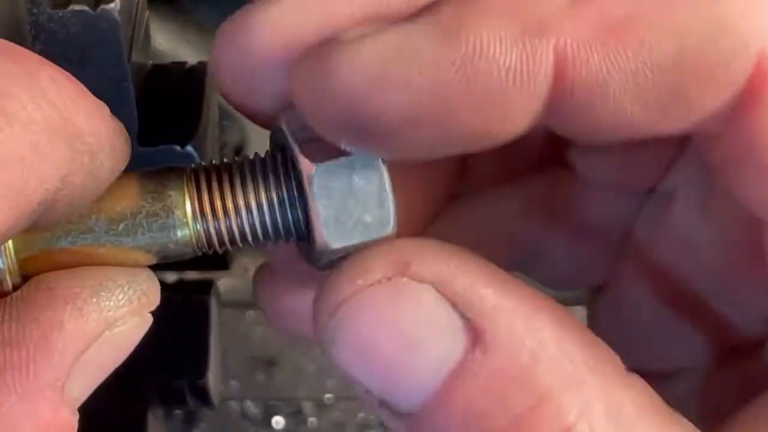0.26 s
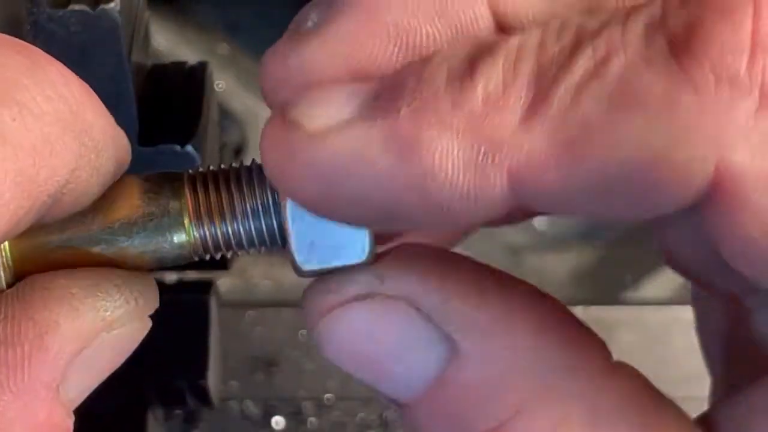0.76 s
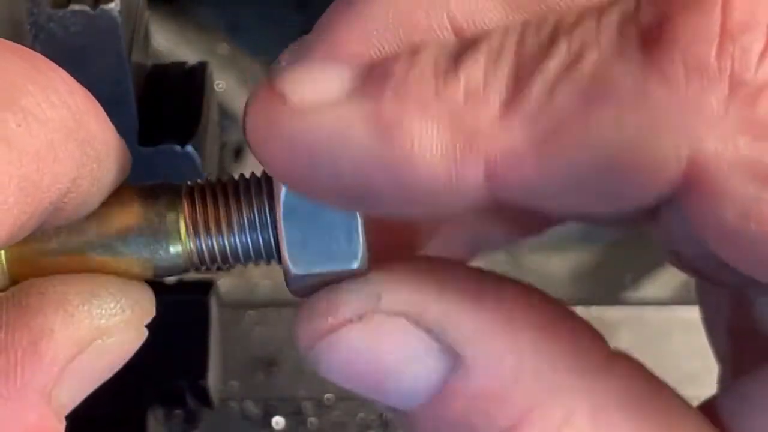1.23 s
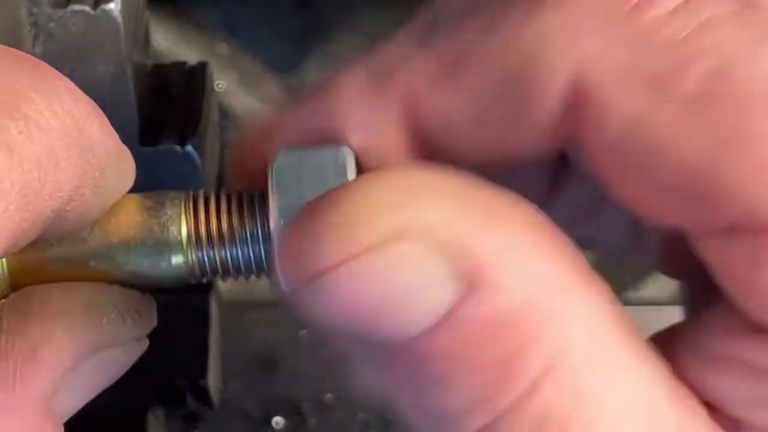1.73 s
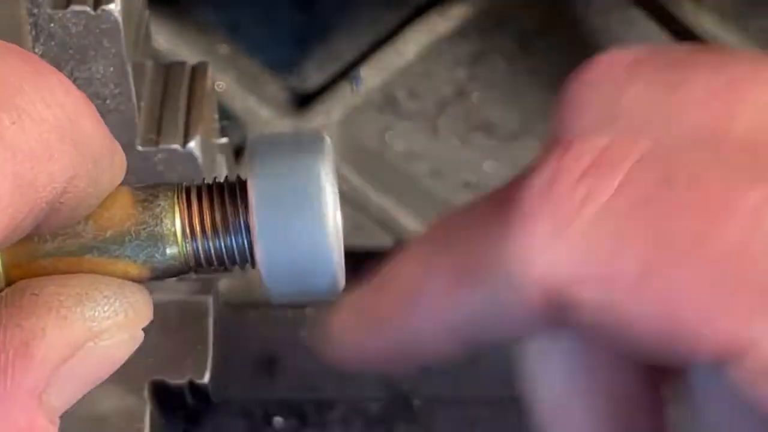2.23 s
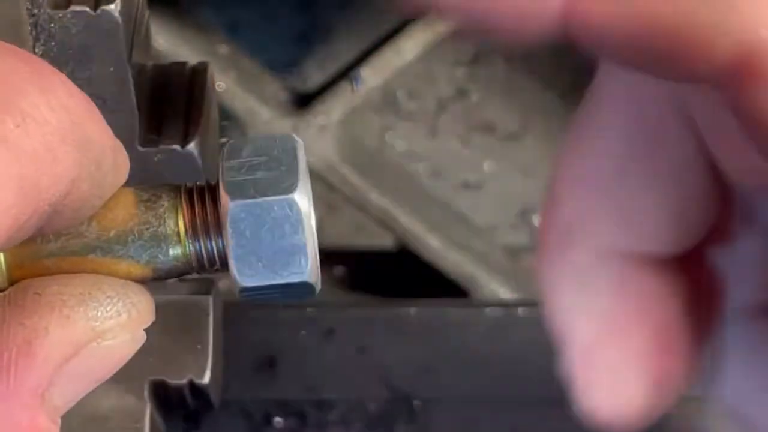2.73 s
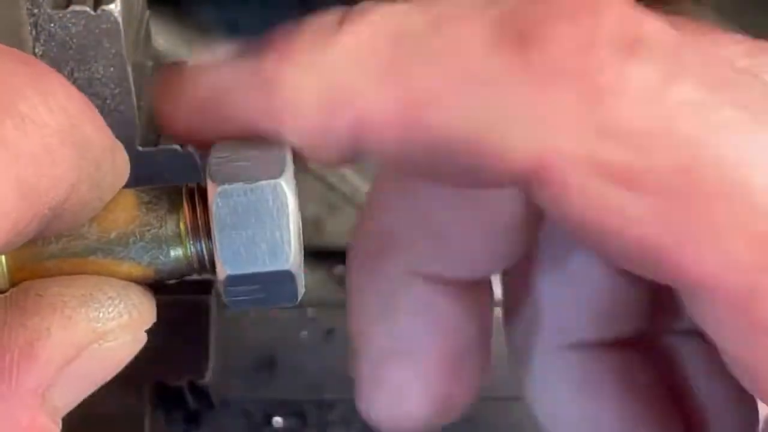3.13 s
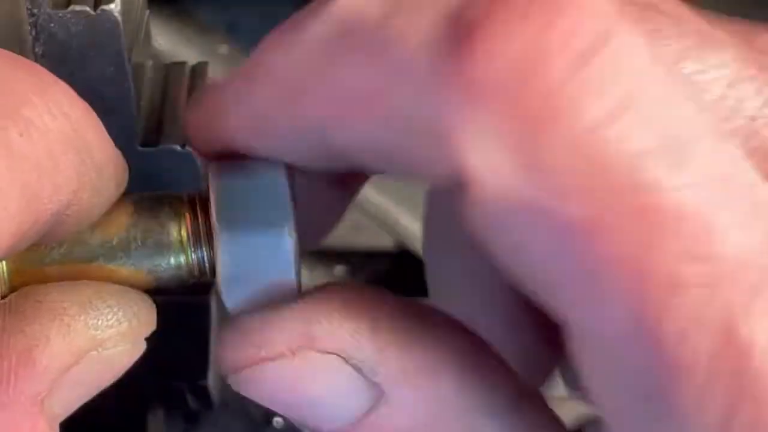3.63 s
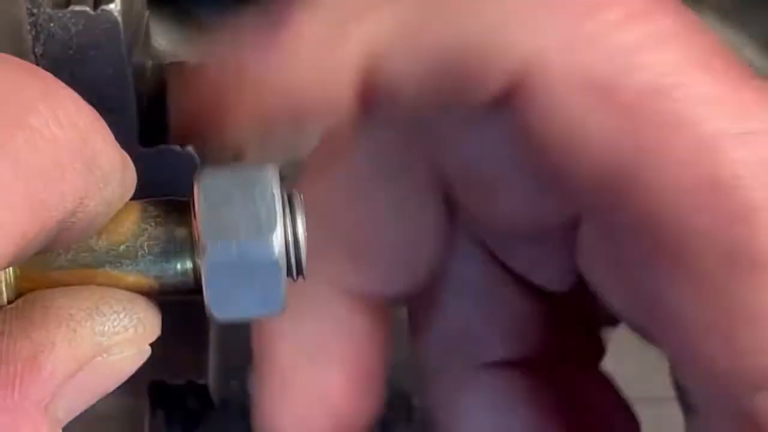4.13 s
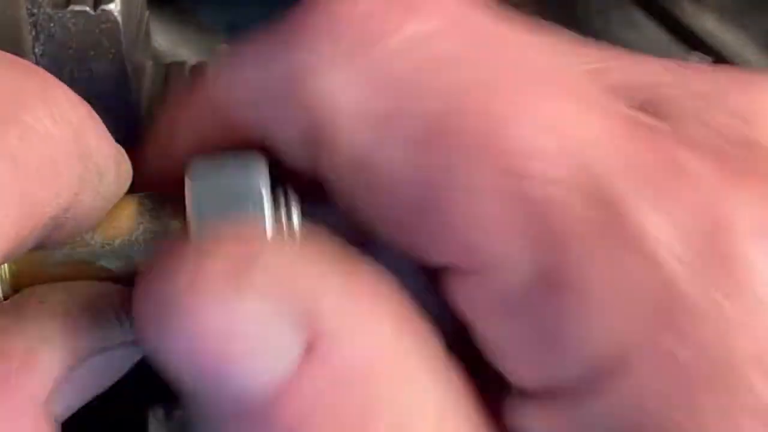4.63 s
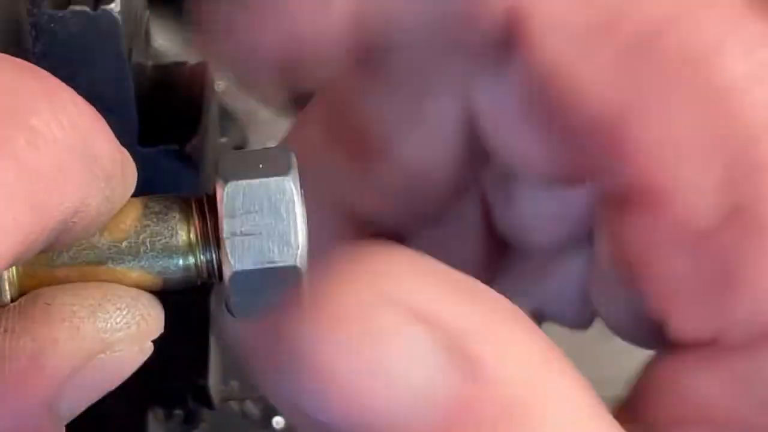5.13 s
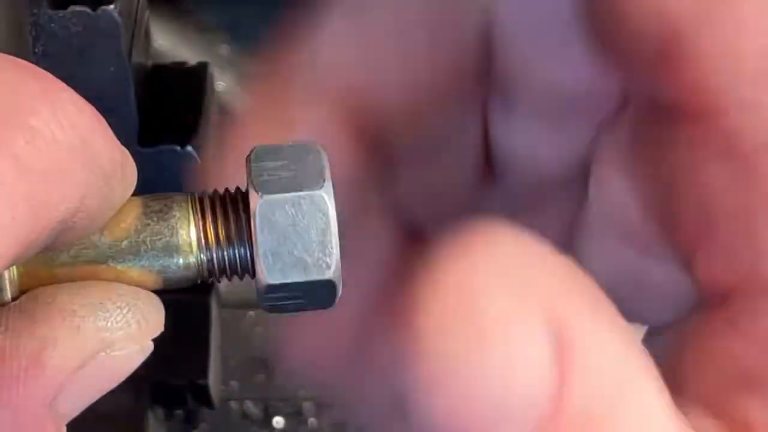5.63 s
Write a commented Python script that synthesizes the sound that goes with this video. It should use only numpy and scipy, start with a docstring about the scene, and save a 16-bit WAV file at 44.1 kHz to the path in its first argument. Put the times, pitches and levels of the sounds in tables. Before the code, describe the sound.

A steel nut clinks onto a bolt, then finger flicks spin it along the thread in short metallic scrapes and whirring rattles over workshop hum.

```python
"""Machines rumble and hum in a workshop: filtered noise and wavering sines, under the hiss of the air.
A steel nut is started on a bolt held in the fingers: knocks, clinks and tiny ticks ring steel resonances.
Flicks then spin it along the thread: dense burr impacts scrape, slowing ticks rattle, a resonant whirr sags.
Fine high hiss, made of grainy impacts, comes and goes; later the deep rumble swells briefly.
Near the end the nut is spun back off and rings more in the upper mids. The microphone is close."""
import sys
import numpy as np
from scipy import signal
from scipy.fft import rfft, irfft
from scipy.io import wavfile

SR = 44100
rng = np.random.default_rng(int(sys.argv[2]) if len(sys.argv) > 2 else 0)


def wrap_up_sound(samples):
    """Save the sound to the file named by the first command line argument, as 16-bit audio."""
    columns = np.atleast_2d(samples).T
    # keep every value between -1 and 1, then stretch to whole-number steps
    tamed = np.clip(columns, -1, 1)
    steps = np.round(tamed * 32767).astype(np.int16)
    wavfile.write(sys.argv[1], SR, steps)


N = 259440
TAPS = 4096
BINS_HZ = np.fft.rfftfreq(TAPS, 1 / SR)
LONG_HZ = np.fft.rfftfreq(N, 1 / SR)
TIME_S = np.arange(N) / SR


def from_db(db):
    """Amplitude factor of a level in dB."""
    return 10 ** (np.asarray(db) / 20)


def unit(x):
    """Scales to an rms of 1."""
    return x / np.sqrt(np.mean(x ** 2) + 1e-30)


def at_hz(points, hz):
    """Reads a table on a log-frequency axis."""
    f, value = np.transpose(points)
    return np.interp(np.log(hz + 1), np.log(f + 1), value)


def drift(rate_hz):
    """Smooth random curve of rms 1: noise under a Gaussian low-pass."""
    noise = rfft(rng.standard_normal(N))
    return unit(irfft(noise * np.exp(-(LONG_HZ / rate_hz) ** 2), N))


def add(mix, start_s, sound):
    """Mixes a sound in at a start time."""
    part = mix[round(start_s * SR):][:len(sound)]
    part += sound[:len(part)]


# Correlation of the room noise in the two channels. Each row: frequency in Hz, correlation.
CHANNEL_LIKENESS = [(60, 0.99), (130, 0.96), (290, 0.75), (640, 0.34), (1400, 0.23), (2800, 0.88),
                    (5000, 0.94), (8000, 0)]


def room_noise(gain):
    """Steady stereo noise of rms 1 with the given spectrum; the channels correlate by frequency."""
    a, b = rfft(rng.standard_normal((2, N)))
    same = np.clip(at_hz(CHANNEL_LIKENESS, LONG_HZ), -1, 1)
    right = same * a + np.sqrt(1 - same ** 2) * b
    return unit(irfft(np.array([a, right]) * gain, N))


# Spectrum of the machine rumble. Each row: frequency in Hz, relative density in dB.
RUMBLE_COLOUR = [(20, -55.5), (30, -16), (43, -4.5), (60, 3.5), (76, -3), (97, 2.5), (125, -4), (165, -11),
                 (260, -14), (360, -20.5)]
# Spectrum of the workshop air. Each row: frequency in Hz, relative density in dB.
AIR_COLOUR = [(100, -5.5), (350, 0.5), (590, 4), (800, -0.5), (1400, -4), (2600, -4), (3500, -8.5),
              (5000, -14), (6600, -20), (7200, -66), (8500, -40), (10200, -28.5), (11500, -53.5),
              (14000, -53.5), (16000, -37)]
# Gain of the air's treble over time. Each row: time in seconds, gain in dB.
AIR_TREBLE_GAIN = [(0.3, 1.5), (0.55, -3.5), (1.2, -5), (1.6, -1.5)]
TREBLE_FROM_HZ = 1730
# Partials of the machine hum. Each row: frequency in Hz, level in dB before the channel balance.
HUM_PARTIALS = [(58.8, -59), (97.2, -57.5), (133, -66.5), (240, -73), (296, -81), (360, -81), (486, -89.5),
                (600, -84)]


def hum(waver_db=3.0, waver_turns=.1):
    """Machine hum: sines that waver in level one by one and in phase in proportion to frequency."""
    total = np.zeros(N)
    for hz, level_db in HUM_PARTIALS:
        waver = from_db(waver_db * drift(6.5))
        turns = hz * TIME_S + waver_turns * hz / HUM_PARTIALS[0][0] * drift(1.0)
        total += from_db(level_db) * unit(waver * np.sin(2 * np.pi * turns))
    return total


def workshop():
    """Low-passed rumble, wavering hum and the hiss of the air, whose treble level changes."""
    rumble_gain = from_db(at_hz(RUMBLE_COLOUR, LONG_HZ)) / (1 + (LONG_HZ / 450) ** 6)
    rumble = from_db(-52.0) * room_noise(rumble_gain)
    air_gain = from_db(at_hz(AIR_COLOUR, LONG_HZ)) * LONG_HZ / (LONG_HZ + 40)
    air = from_db(-65.0) * room_noise(air_gain) * from_db(.5 * drift(4.6))
    high_pass = 1 - 1 / (1 + (LONG_HZ / TREBLE_FROM_HZ) ** 8)
    treble = irfft(rfft(air) * high_pass, N)
    treble_gain = from_db(np.interp(TIME_S, *np.transpose(AIR_TREBLE_GAIN)))
    air = air + treble * (treble_gain - 1)
    # left and right balance in dB
    return (rumble + hum()) * from_db([[.2], [-.2]]) + air * from_db([[.6], [-.6]])


def humps(modes):
    """Sum of resonance shapes over frequency, from rows of Hz, width Hz, height."""
    return sum(height / (1 + (2 * (BINS_HZ - hz) / width) ** 2) for hz, width, height in modes)


def causal(gain):
    """Causal (minimum-phase) response, of energy 1, with the given gain shape over frequency."""
    log_gain = np.log(gain + 1e-5)
    circle = np.concatenate([log_gain, log_gain[-2:0:-1]])
    ring = np.fft.ifft(np.exp(np.conj(signal.hilbert(circle)))).real
    return ring / np.linalg.norm(ring)


def colourless(x):
    """Keeps the phases of a contact and evens out its spectrum; energy 1."""
    flat = irfft(np.exp(1j * np.angle(rfft(x, TAPS))))[:len(x)]
    return flat / np.linalg.norm(flat)


# Resonances of nut and bolt. Each row: frequency in Hz, width in Hz, height in dB.
STEEL_RESONANCES = [(1760, 130, 4), (2120, 72, -8), (2512, 95, 13), (2680, 90, 5.5), (3080, 240, 9),
                    (3450, 90, 7.5), (3830, 64, 11.5), (4174, 57, 11.5), (4410, 130, 4), (4860, 58, 10),
                    (5430, 38, 7), (5880, 61, 5), (6190, 69, 8.5), (6560, 53, 8.5), (9330, 92, 1.5),
                    (10380, 90, -4)]
# Broad colour of steel on steel. Each row: frequency in Hz, relative gain in dB.
STEEL_COLOUR = [(300, -71.5), (1000, -9), (1500, -1), (2500, 0), (4000, -3), (5500, 2), (7000, 1),
                (8500, -2), (10000, -3), (12500, -12.5), (16000, -19)]


def steel_ring(contact_db, tuning=1):
    """Response of nut and bolt to one contact: resonant peaks over a broad colour."""
    hz, width_hz, height_db = np.transpose(STEEL_RESONANCES)
    peaks = humps(zip(hz * tuning, width_hz, from_db(height_db) ** 2))
    return causal(from_db(at_hz(STEEL_COLOUR, BINS_HZ) + contact_db) * np.sqrt(1 + peaks))


# The nut knocks across its play. Each row: start in seconds, relative peak in dB, dullness in dB (low ring
# over high ring), ring of the bolt in dB, ring of the nut in dB.
NUT_KNOCKS = [(0.23, -43.5, 4.5, 5, 7), (0.247, -48.5, 7, -2, 2), (0.29, -42, -15, 10, 0),
              (1.5421, -49.5, 2, 0, 8), (1.771, -55, -2, 0.5, 3), (1.7793, -47.5, 3.5, 6, 4),
              (1.8048, -39.5, -19, 16, -1), (1.807, -40.5, -10, 10, -4), (2.002, -53, -2.5, 6, -3),
              (2.123, -58, 3, -2, -4), (2.2092, -52, 0, -6.5, 5), (2.214, -50, 4, 7, -2),
              (2.2306, -39.5, -11, -4, -8), (2.239, -37, -9, -2, -15), (2.2485, -50, -15, -2, 0),
              (2.281, -45, -19, -3, -4), (2.2972, -47, -14, 3, -6), (2.3091, -44, -5, 5, -4),
              (2.3385, -52, -6, 2, -2), (2.407, -53, -4, -0.5, -11), (2.437, -47, -1, 3, -6),
              (2.4605, -40, -14, 13, -13), (2.4634, -44, -1, 5, -10), (2.4964, -49, -3, 0, -3),
              (2.512, -55, -4, 0, -3), (2.5243, -42, -10, 12, -4), (2.831, -56, 3, 2, -4),
              (2.855, -46, -8, 5, -6), (2.8662, -48, 3, 9, -2), (2.878, -49, -4, 4, -4),
              (2.8928, -43, -15, 4, -5), (2.923, -45, -3, 6, -5), (2.9375, -58, 7, 4, 0),
              (2.956, -61, 7, 2, 0), (3.7198, -45.5, -4.5, 5, -8), (3.82, -52.5, -10, 1, 8),
              (4.2571, -49, 1, -2, -6), (4.7259, -44.5, -10, 0, 4), (4.926, -50, -2, 0.5, 0),
              (4.9691, -47, 4, 8, 0), (4.973, -46, -8, 2, 2), (5.0058, -39.5, -10, 0, -2),
              (5.0218, -44, 1, -3, 2), (5.025, -48, 4, 3, -2), (5.041, -49, 9, -7, -4),
              (5.191, -44, -12, 5.5, -4), (5.198, -48, -2, 0, -2), (5.2134, -49, -3, 0, 0),
              (5.222, -38.5, -10.5, 8, 1), (5.247, -33.5, -11, 5, 2), (5.2517, -40, 2, 0, 1),
              (5.2585, -46, 2, 6, 0), (5.274, -43.5, 2, 7, -2), (5.3372, -51, 7, 7, 3),
              (5.3651, -53.5, 3, 8, 2), (5.403, -54, -1, -3, 0), (5.412, -48, -27, -5, 5),
              (5.484, -41.5, -1, 7, 7), (5.529, -50, 4, 5, 11), (5.7207, -47, -19, 5, -9),
              (5.7482, -36, -12, 1, 4), (5.774, -54, 9, 8, 0)]
# Colour of a knock. Each row: frequency in Hz, relative gain in dB.
KNOCK_COLOUR = [(900, -8), (1700, 7), (2100, -2.5), (2600, 3), (3300, -1), (4200, 0.5), (4780, 3.5),
                (5600, 3), (8000, 2.5), (11000, 2.5)]
# Resonances a knock rings when the fingers leave the part free.
# Each row: frequency in Hz, width in Hz, share of the ring's dB.
FREE_BOLT_RING = [(1650, 260, 0.65), (2620, 400, 0.58)]
FREE_NUT_RING = [(4440, 310, 0.44), (4840, 510, 1)]
CHATTER_FALL_S = 0.0022


def knocks(chatter=0.12, graze_s=0.0015, focus_db=7, centre_hz=3600, dullness_db_per_octave=16,
           detune=0.022):
    """Each knock is a light graze, one hard contact and a brief chatter; the grip shifts the resonances."""
    out, t = np.zeros(N), TIME_S[:TAPS // 8]
    for start_s, peak_db, dullness_db, bolt_db, nut_db in NUT_KNOCKS:
        envelope = np.minimum((t / graze_s) ** 3, np.exp((graze_s - t) / CHATTER_FALL_S))
        contact = chatter * rng.standard_normal(len(t)) * envelope
        contact[round(graze_s * SR)] = 1
        # a harder contact drives a higher band of the steel
        octaves = np.log2((BINS_HZ + 1) / centre_hz) + dullness_db / dullness_db_per_octave
        colour_db = at_hz(KNOCK_COLOUR, BINS_HZ) - np.minimum(focus_db * octaves ** 2, 12)
        colour_db = colour_db + bolt_db * humps(FREE_BOLT_RING) + nut_db * humps(FREE_NUT_RING)
        tuning = 1 + detune * rng.standard_normal(len(STEEL_RESONANCES))
        sound = signal.fftconvolve(colourless(contact), steel_ring(colour_db, tuning))
        # the peak is set within 4-7 kHz
        ring_band = irfft(rfft(sound, TAPS) * ((BINS_HZ > 4000) & (BINS_HZ < 7000)))
        add(out, start_s, from_db(peak_db) * sound / abs(ring_band).max())
    return from_db(-2.0) * out


# The loosely held nut drops into the thread. Each row: hard contact in seconds, peak of its ring in dB.
NUT_CLINKS = [(0.232, -44.5), (1.4099, -28), (1.5442, -53.5), (5.752, -35)]
# Resonances of the clink. Each row: frequency in Hz, width in Hz, relative height in dB.
CLINK_RESONANCES = [(1700, 120, -8), (2150, 50, -7), (2510, 120, -0.5), (2750, 170, -5.5),
                    (3440, 110, -11.5), (4150, 130, -5), (4820, 94, -1), (5500, 76, -9), (6100, 170, -14.5),
                    (6500, 130, -13), (9500, 500, -26), (11300, 900, -33)]
CLINK_LOW_HZ = 2100  # the small nut radiates little below this


def clinks(graze_s=0.001205, graze_db=-16, bounce_s=0.001184, bounce_db=-15):
    """A light graze, one hard contact and a tiny bounce ring the free nut."""
    out = np.zeros(N)
    peaks = humps([(hz, width_hz, from_db(db) ** 2) for hz, width_hz, db in CLINK_RESONANCES])
    radiation = 1 - 1 / (1 + (BINS_HZ / CLINK_LOW_HZ) ** 6)
    ring = causal(np.sqrt(peaks * radiation))
    for hit_s, peak_db in NUT_CLINKS:
        sound = from_db(peak_db) * ring / abs(ring).max()
        add(out, hit_s, sound)
        for delay_s, db in (-graze_s, graze_db), (bounce_s, bounce_db):
            touch = colourless(rng.standard_normal(TAPS // 64))
            add(out, hit_s + delay_s, from_db(db) * np.convolve(sound, touch))
    return out


# Narrow-band ticks and tiny squeaks of the steel; the rows at 0.290 and 1.805 s are the bright tops of
# knocks. Each row: start in seconds, relative level in dB, centre of the band in Hz.
NARROW_TICKS = [(0.290, -54.5, 10900), (1.779, -54, 6140), (1.805, -61, 13000), (2.002, -55, 6500),
                (2.423, -45.5, 7500), (2.436, -46, 6560), (2.8317, -56, 6800), (2.864, -44, 6740),
                (4.970, -45, 6680), (5.246, -43.5, 6140), (5.446, -48.5, 6500), (5.456, -46, 5660),
                (5.711, -47, 6800), (5.72, -42, 5480)]


def narrow_ticks(rise_s=0.0013, width_share=0.16):
    """A few milliseconds of random shiver drive a narrow band of the steel: a tick or tiny squeak."""
    out, t = np.zeros(N), TIME_S[:TAPS // 4]
    for start_s, level_db, hz in NARROW_TICKS:
        band_db = -20 * np.log10(1 + ((BINS_HZ - hz) / (width_share * hz)) ** 2)
        shiver = rng.choice([-1, 1], len(t)) * t / rise_s * np.exp(1 - t / rise_s)
        add(out, start_s, from_db(level_db) * signal.fftconvolve(shiver, steel_ring(band_db)))
    return out


def impacts(per_s, spread_db, clump_db, clump_rate_hz):
    """Random tiny impacts of uneven size that come in clumps; rms 1."""
    size_db = spread_db * np.minimum(rng.exponential(1, N), 3)
    size = from_db(size_db) * rng.choice([-1, 1], N)
    struck = rng.random(N) < per_s / SR
    return unit(size * struck * from_db(clump_db * drift(clump_rate_hz)))


def round_the_thread(hits, colour, count=8, vary_db=3.5, detune=0.022, skid_s=0.001):
    """Impacts skid briefly on one of a few thread spots, each with its own tuning and favoured resonances."""
    spot, out, t = rng.integers(0, count, N), np.zeros(N), TIME_S[:TAPS // 32]
    for k in range(count):
        favour = humps([(hz, 2 * width, rng.standard_normal()) for hz, width, _ in STEEL_RESONANCES])
        tuning = 1 + detune * rng.standard_normal(len(STEEL_RESONANCES))
        ring = steel_ring(at_hz(colour, BINS_HZ) + vary_db * favour, tuning)
        skid = colourless(rng.standard_normal(len(t)) * np.exp(-t / skid_s))
        out += signal.oaconvolve(hits * (spot == k), np.convolve(ring, skid))[:N]
    return out


# A finger flicks the nut round. Each row: hardest push in seconds, length of the push in seconds, scrape of
# the flanks in relative dB, rattle of the loose nut in relative dB, coasting time in seconds, whirr in
# relative dB, whirring time in seconds.
NUT_FLICKS = [(1.784, 0.019, -60, -74, 0.032, -74, 0.021), (2.242, 0.031, -55.5, -60, 0.094, -67.5, 0.12),
              (2.448, 0.021, -52.5, -65, 0.046, -62.5, 0.039),
              (2.519, 0.024, -65.5, -57, 0.0095, -61, 0.0078),
              (2.649, 0.015, -56.5, -71.5, 0.055, -68, 0.054),
              (2.872, 0.017, -54.5, -62, 0.074, -61.5, 0.081), (3.823, 0.022, -85, -97, 0.018, -94, 0.016),
              (4.049, 0.036, -62.5, -69, 0.1, -68, 0.11), (4.256, 0.018, -60.5, -74, 0.049, -65.5, 0.057),
              (4.694, 0.043, -64.5, -75, 0.061, -70.5, 0.05), (4.987, 0.03, -52.5, -66, 0.11, -67.5, 0.13),
              (5.247, 0.03, -54.5, -64, 0.1, -67, 0.097), (5.494, 0.025, -51, -63.5, 0.095, -66.5, 0.26),
              (5.744, 0.022, -52.5, -66, 0.089, -67.5, 0.27)]
PUSH_RISE_DB, PUSH_FALL_DB = 10.5, 14.5  # over one push length before and after the hardest push
BITE_DB_PER_S = 1500  # extra steepness as the finger first lands on the nut


def push_force():
    """Gain over time of the finger's pressure: it lands, bears down and lets go."""
    gain = np.zeros(N)
    for peak_s, push_s, scrape_db, *_ in NUT_FLICKS:
        u = (TIME_S - peak_s) / push_s
        landing_db = BITE_DB_PER_S * np.maximum(peak_s - push_s - TIME_S, 0)
        shape_db = np.minimum(PUSH_RISE_DB * u, -PUSH_FALL_DB * u) - landing_db
        gain += from_db(scrape_db + shape_db)
    return gain


# Colour of the scrape. Each row: frequency in Hz, relative gain in dB.
SCRAPE_COLOUR = [(1000, 2.5), (2500, -7), (4000, -4.5), (5500, 1), (10000, -3), (16000, -3)]


def scrape():
    """Burrs on the fresh flanks catch and let go in a dense stream."""
    burrs = impacts(per_s=3000, spread_db=2.5, clump_db=3.0, clump_rate_hz=100) * push_force()
    return from_db(2.5) * round_the_thread(burrs, SCRAPE_COLOUR)


def since_flick():
    """Seconds since the latest hardest push, or since the start before any."""
    starts_s = np.array([0] + [row[0] for row in NUT_FLICKS])
    return TIME_S - starts_s[np.searchsorted(starts_s, TIME_S, side="right") - 1]


SPIN_LAG_S = 0.001  # full speed comes just after the hardest push
SPIN_UP_DB_PER_S, STOP_DB_PER_S = 597, 717  # growth with speed; extra fall as friction stops the nut


def spin_force(spins, fall_db):
    """Gain of spins (s, dB, coasting s): the nut gathers speed, coasts down by fall_db and stops."""
    gain, t = np.zeros(N), TIME_S[:SR // 2] - 0.1
    for push_s, level_db, coast_s in spins:
        shape_db = np.minimum(SPIN_UP_DB_PER_S * t, -fall_db * t / coast_s)
        shape_db = shape_db - STOP_DB_PER_S * np.maximum(t - coast_s, 0)
        add(gain, push_s + SPIN_LAG_S + t[0], from_db(level_db + shape_db))
    return gain


# Colour of the rattle. Each row: frequency in Hz, relative gain in dB.
RATTLE_COLOUR = [(900, -14), (1700, -1), (2150, -12), (2800, -0.5), (4500, -5.5), (6300, -8), (8000, -9.5),
                 (16000, -27)]
TICKS_PER_S = 290  # middle rate at full speed
TICK_SLOWING_S = 0.25  # time in which that rate halves
COAST_FALL_DB = 5.5  # sinking of the rattle while the nut coasts


def rattle(uneven=0.41, size_db=3.0, rolling_db=-9):
    """The spinning nut ticks against the thread, ever more slowly, over the fine grain of rolling."""
    rate_per_s = TICKS_PER_S / (1 + since_flick() / TICK_SLOWING_S) * np.exp(uneven * drift(200))
    ticks = np.diff(np.floor(np.cumsum(rate_per_s) / SR), prepend=0)
    ticks = ticks * rng.choice([-1, 1], N) * from_db(size_db * rng.standard_normal(N))
    grain = impacts(per_s=2800, spread_db=1.0, clump_db=5.5, clump_rate_hz=230)
    hits = ticks * np.sqrt(SR / TICKS_PER_S) + from_db(rolling_db) * grain
    spins = [(s, rattle_db, coast_s) for s, _, _, rattle_db, coast_s, _, _ in NUT_FLICKS]
    return from_db(3.0) * round_the_thread(hits * spin_force(spins, COAST_FALL_DB), RATTLE_COLOUR)


def resonate(x, hz, width_hz):
    """A resonance of gain 1 that follows the curve hz: shift to zero, low-pass, shift back."""
    turn, r = np.exp(2j * np.pi * np.cumsum(hz) / SR), np.exp(-np.pi * width_hz / SR)
    return 2 * (turn * signal.lfilter([(1 - r) ** 2], [1, -2 * r, r * r], x / turn + 1e-18)).real


# Resonances of the whirr at full speed. Each row: frequency in Hz, width in Hz, relative level in dB.
WHIRR_RESONANCES = [(1746, 240, -0.5), (2560, 240, -4.5), (2990, 380, -8)]
WHIRR_FALL_DB = 4.5  # sinking of the whirr before it stops
WHIRR_SAG_PER_S = 0.27  # share of its pitch lost per second, down to 0.93 at most


def whirr():
    """The rolling flanks keep the steel ringing; the ring sags in pitch as the nut slows."""
    rolling = impacts(per_s=3800, spread_db=0.5, clump_db=3.0, clump_rate_hz=43)
    pitch = np.maximum(1 - WHIRR_SAG_PER_S * since_flick(), 0.93)
    ring = np.zeros(N)
    for hz, width_hz, level_db in WHIRR_RESONANCES:
        ring += from_db(level_db) * unit(resonate(rolling, hz * pitch, width_hz))
    spins = [(s, whirr_db, run_s) for s, _, _, _, _, whirr_db, run_s in NUT_FLICKS]
    return ring * spin_force(spins, WHIRR_FALL_DB)


# Spells of high hiss while the fingers work. Each row: start in seconds, length in seconds, relative level
# in dB.
FINGER_HISS_SPELLS = [(1.865, 0.012, -83.5), (3.395, 0.18, -90), (3.814, 0.0025, -75), (4.02, 0.89, -81.5),
                      (4.673, 0.046, -85.5), (5.45, 0.021, -79.5)]
HISS_RISE_DB_PER_S, HISS_FALL_DB_PER_S = 237, 190
HISS_REST_DB = -105  # relative level that stays between spells


def hiss_level():
    """Gain over time of the hiss: each spell swells, holds and fades."""
    gain = np.full(N, from_db(HISS_REST_DB))
    for start_s, length_s, level_db in FINGER_HISS_SPELLS:
        before_db = HISS_RISE_DB_PER_S * np.maximum(start_s - TIME_S, 0)
        after_db = HISS_FALL_DB_PER_S * np.maximum(TIME_S - start_s - length_s, 0)
        gain += from_db(level_db - (before_db + after_db))
    return gain


# Colour of the fine hiss. Each row: frequency in Hz, relative gain in dB.
HISS_COLOUR = [(3000, -21), (6000, -5.5), (8000, -19.5), (9500, -7.5), (11000, -5), (12000, -7),
               (13500, -18), (16000, -24.5)]


def fine_hiss():
    """Dense tiny impacts make a faint, high, grainy hiss that swells and fades."""
    grain = impacts(per_s=18000, spread_db=4.5, clump_db=1.5, clump_rate_hz=71) * hiss_level()
    # the hiss colour replaces the broad steel colour
    colour_db = at_hz(HISS_COLOUR, BINS_HZ) - at_hz(STEEL_COLOUR, BINS_HZ)
    return from_db(6.5) * signal.oaconvolve(grain, steel_ring(colour_db))[:N]


# Brief swells of the rumble. Each row: middle in seconds, level in dB.
RUMBLE_SWELLS = [(3.83, -43), (5.5, -48), (5.82, -49.5)]


def bumps(length_s=0.071, centre_hz=55, width_hz=9):
    """The deep rumble swells briefly: a narrow noise band under Gaussian envelopes."""
    swell = sum(from_db(db) * np.exp(-.5 * ((TIME_S - s) / length_s) ** 2) for s, db in RUMBLE_SWELLS)
    return swell * room_noise(np.exp(-.5 * ((LONG_HZ - centre_hz) / width_hz) ** 2))


BACK_OFF_S = 5.3  # from here on the nut is spun back off
# Resonance that the other flank brings out. One row: frequency in Hz, width in Hz, gain in dB.
OTHER_FLANK_RING = (2880, 770, -9)


def backing_off(x):
    """Spun the other way, the nut bears on the other flank and rings more in the upper mids."""
    hz, width_hz, gain_db = OTHER_FLANK_RING
    return x + from_db(gain_db) * resonate(x * (TIME_S > BACK_OFF_S), np.full(N, hz), width_hz)


# Phase of the left microphone port over the right for close sounds. Each row: frequency in Hz, phase in
# radians.
LEFT_PORT_LEAD = [(800, -.4), (1800, -.45), (2600, 0), (3200, -.45), (4000, -.4), (4600, -.85),
                  (6000, -1.45), (6600, -2), (7000, -2.95), (8200, -3.3), (9700, -4.7), (11300, -6.2),
                  (14400, -9.4), (16000, -11.2)]


def ports(x, balance_db=0.1):
    """The two microphone ports hear a close sound with a phase gap that grows towards the treble."""
    lead = np.exp(.5j * at_hz(LEFT_PORT_LEAD, BINS_HZ)) * from_db(balance_db / 2)
    pair = np.roll(irfft(np.array([lead, 1 / lead])), TAPS // 2, axis=1)
    return signal.oaconvolve(x[None], pair, axes=1)[:, TAPS // 2:][:, :N]


# Reverberation of the room. Each row: frequency in Hz, time to fall by 60 dB in seconds.
ROOM_DECAY = [(500, 0.11), (3000, 0.19), (8000, 0.083), (14000, 0.27)]


def room(x, delay_s=0.00086):
    """A diffuse tail: noise that decays at its own rate in each band."""
    hz, t, z = signal.stft(rng.standard_normal((2, SR // 2)), SR, nperseg=256)
    decay_db = -60 * t / at_hz(ROOM_DECAY, hz)[:, None]
    tail = signal.istft(z * from_db(decay_db), SR)[1]
    tail *= TIME_S[:tail.shape[1]] > delay_s
    return signal.oaconvolve(x, tail / np.linalg.norm(tail[0]), axes=1)[:, :N]


def scene():
    """The nut close by, a trace of its echo, and the workshop behind."""
    on_thread = backing_off(scrape() + rattle() + whirr() + knocks())
    nut = ports(on_thread + clinks() + narrow_ticks() + fine_hiss())
    return nut + from_db(-14.0) * room(nut) + bumps() + workshop()


EDGE_HZ = 15900


def record(dry):
    """Band limit: a steep linear-phase low-pass at the edge frequency."""
    low_pass = signal.firwin(511, EDGE_HZ, window=("kaiser", 9), fs=SR)
    return signal.oaconvolve(dry, low_pass[None], "same")


dry = scene()
out = record(dry)
wrap_up_sound(out)
```